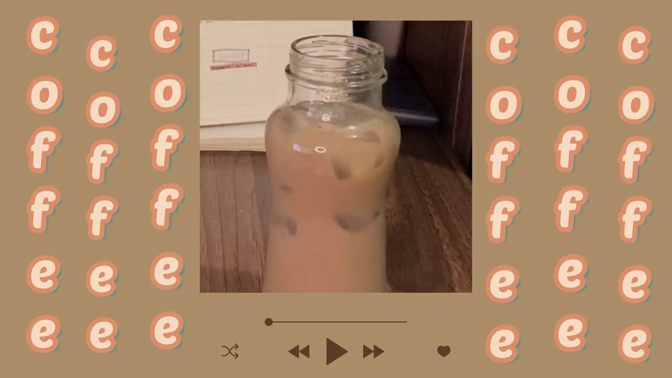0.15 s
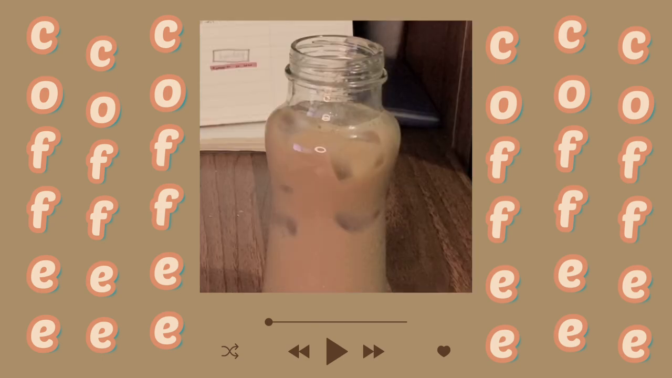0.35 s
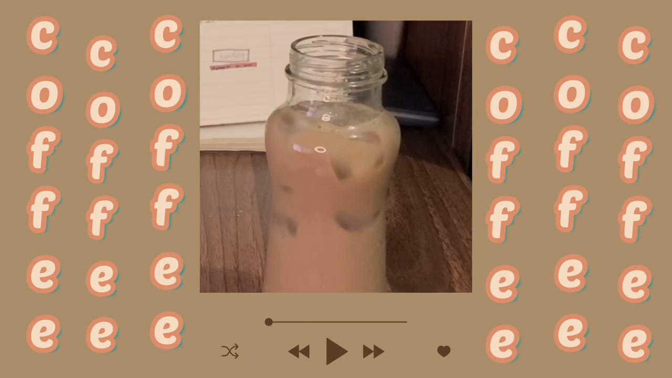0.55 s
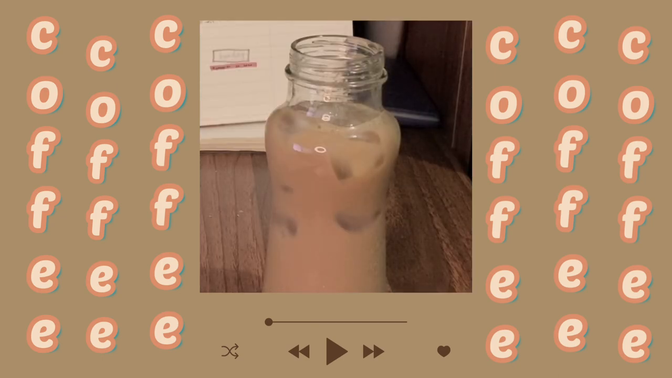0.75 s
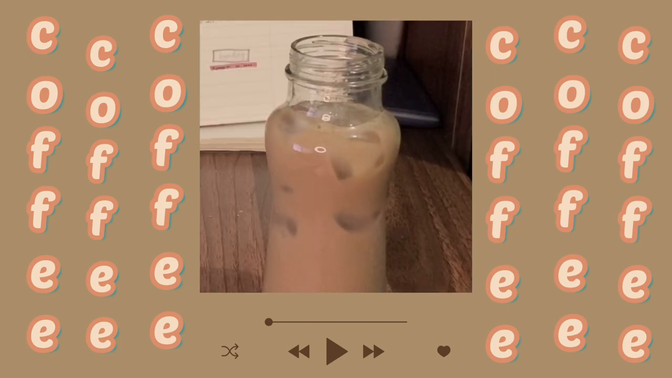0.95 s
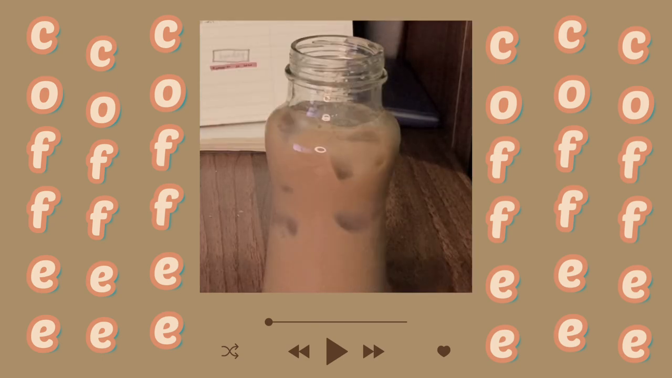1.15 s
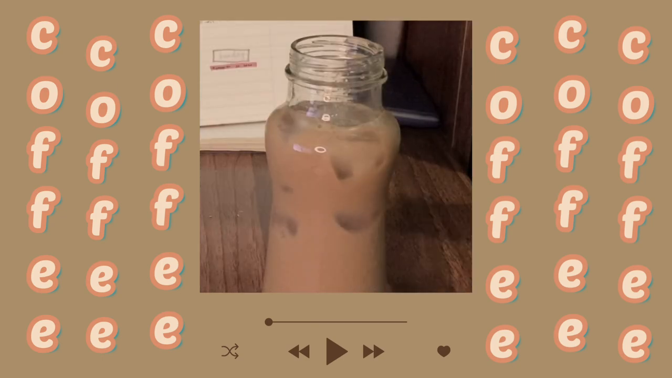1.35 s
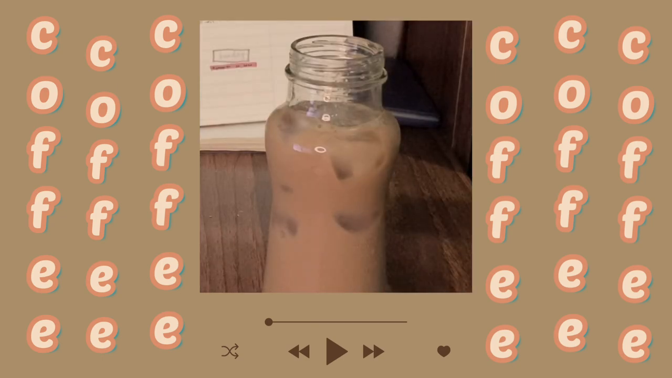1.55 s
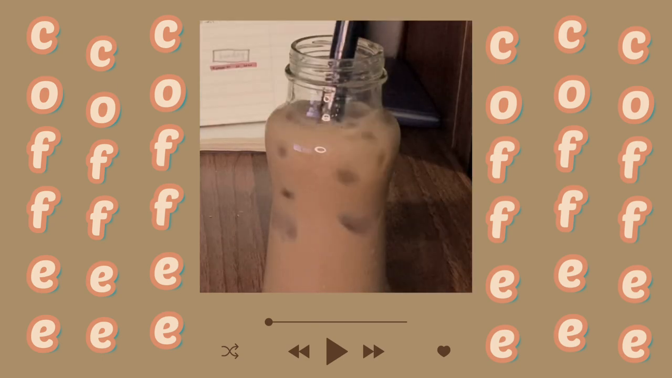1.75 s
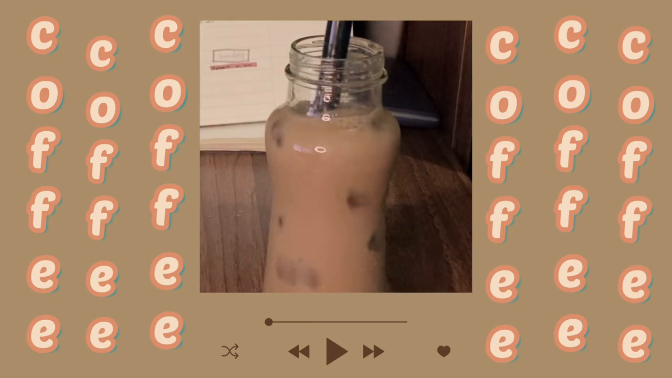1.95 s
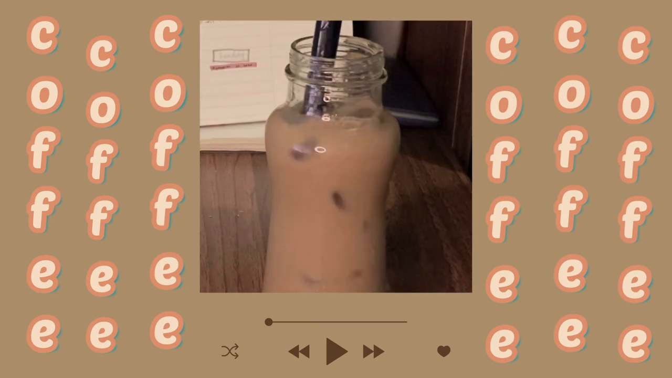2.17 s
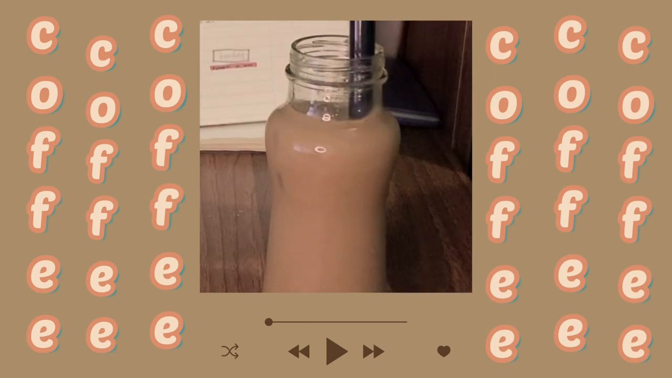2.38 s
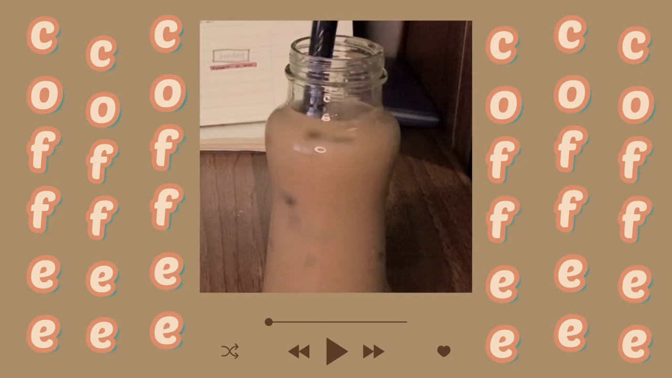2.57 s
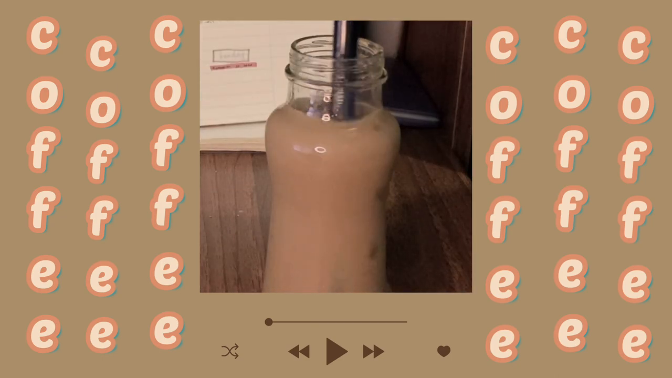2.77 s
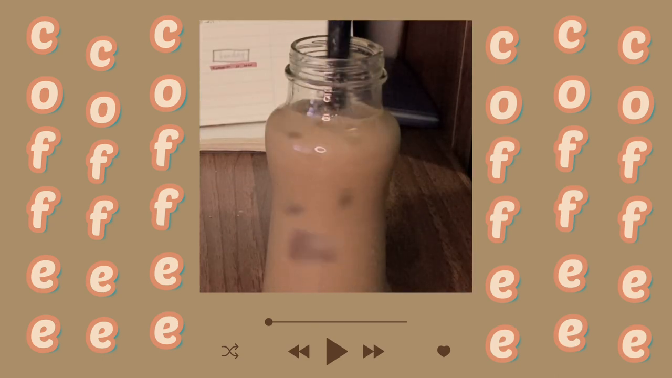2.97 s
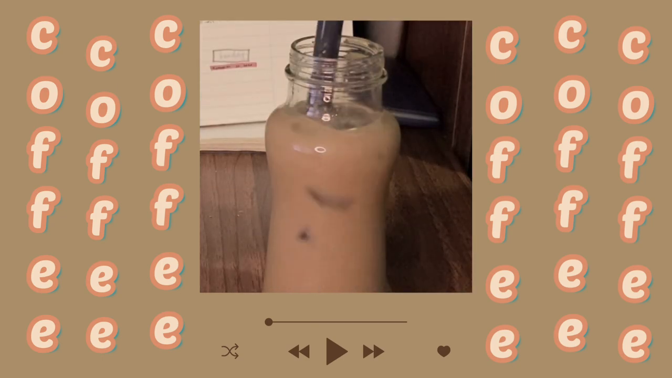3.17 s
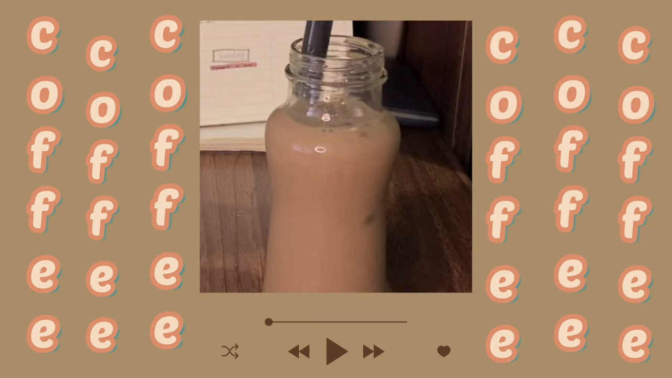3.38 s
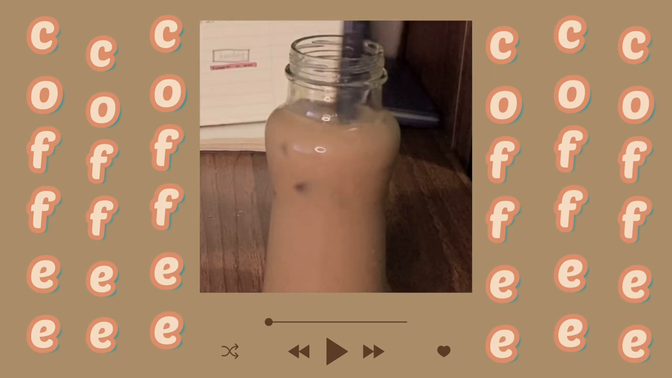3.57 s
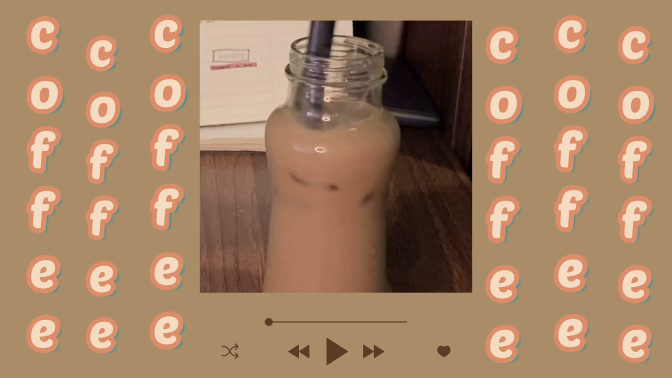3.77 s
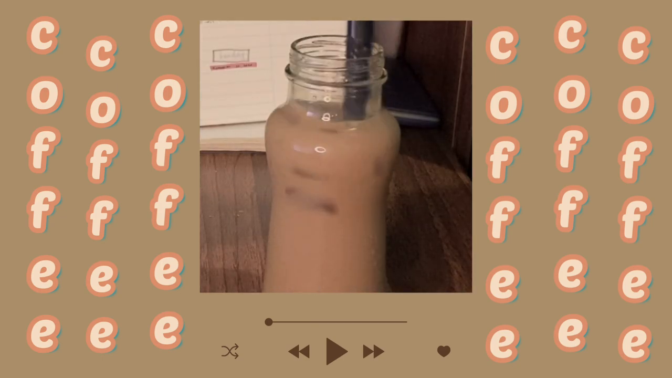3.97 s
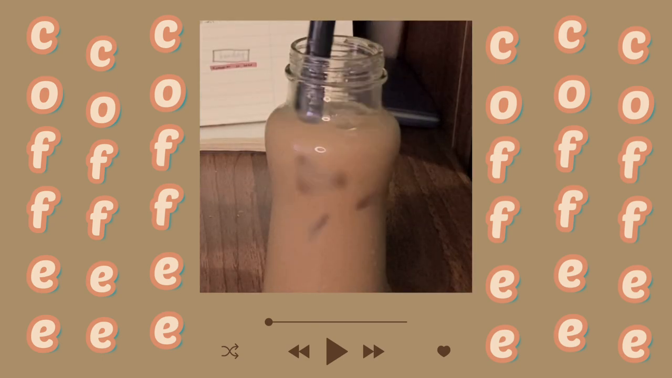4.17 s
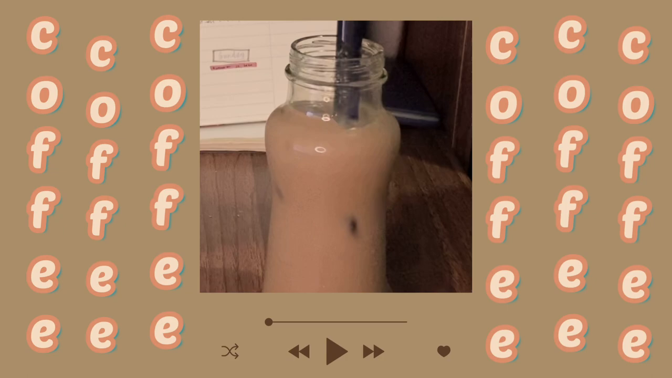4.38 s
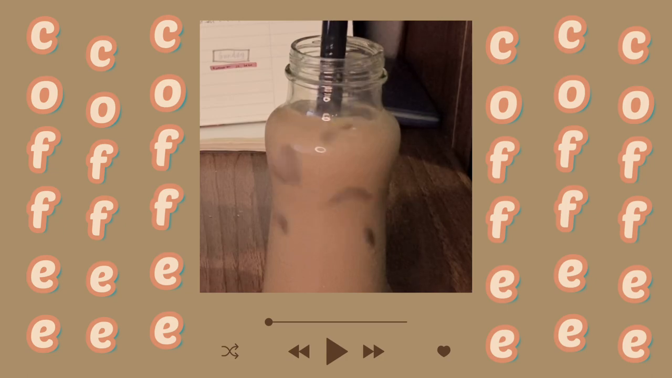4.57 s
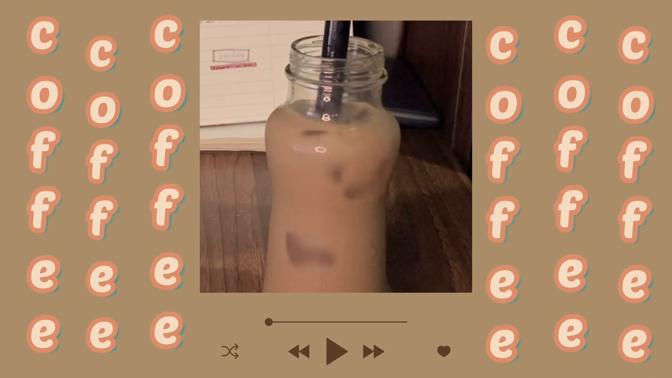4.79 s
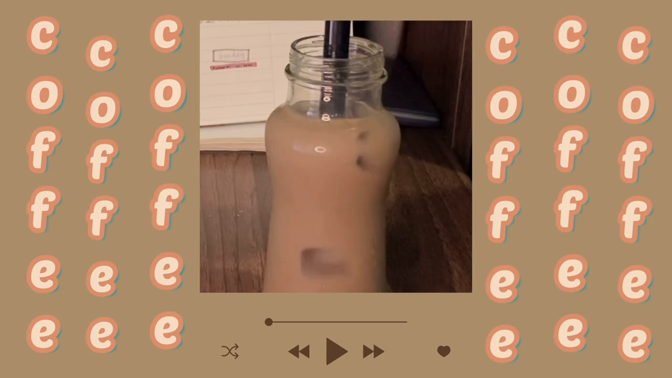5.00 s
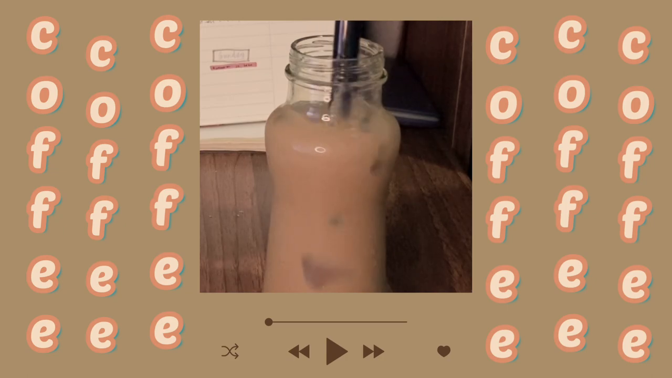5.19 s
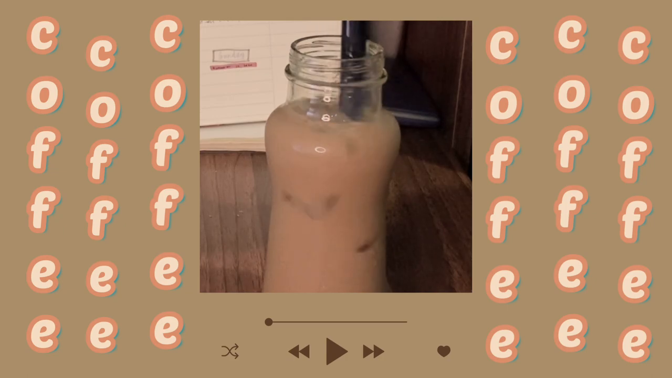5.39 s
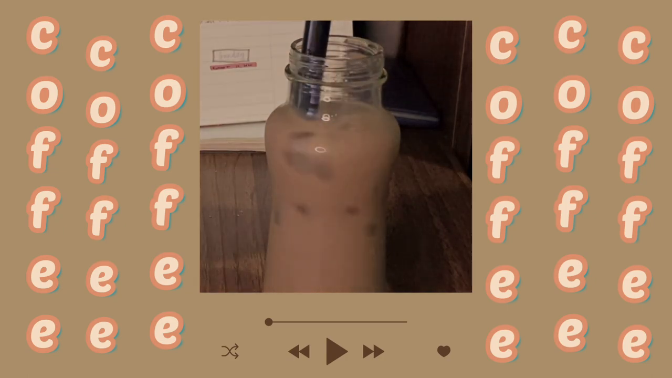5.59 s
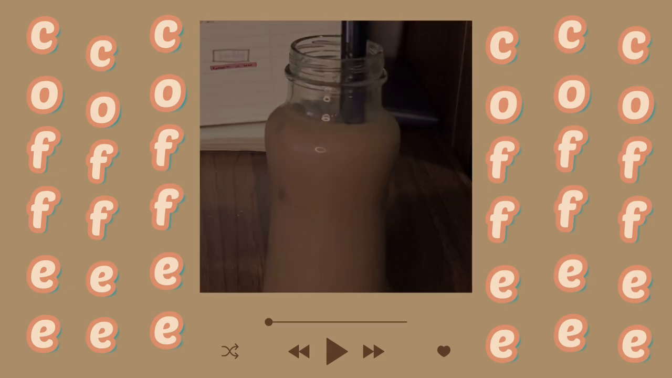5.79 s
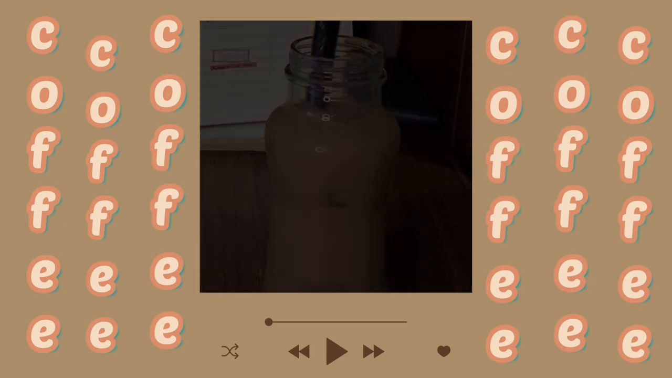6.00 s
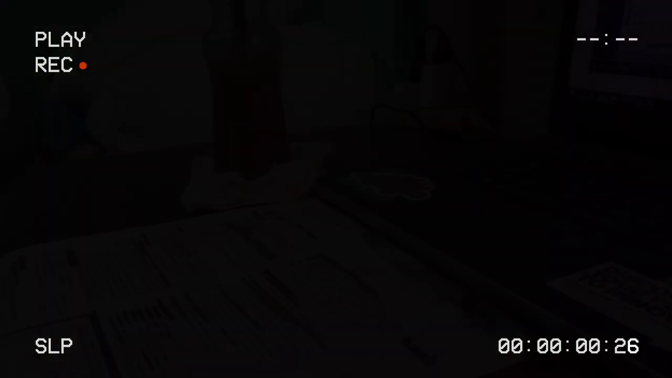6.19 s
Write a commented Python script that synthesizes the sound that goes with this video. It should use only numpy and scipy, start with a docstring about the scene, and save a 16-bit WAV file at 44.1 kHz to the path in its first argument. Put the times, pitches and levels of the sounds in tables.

```python
"""Iced coffee stirred in a glass bottle

A straw stirs ice cubes in a glass bottle on a wooden desk, close to a phone in a small quiet room.
Cubes strike and graze the glass: sums of decaying modes, short because the drink damps the wall, with noise for ice.
Harder pushes excite modes of the desk; low handling thuds come first, as decaying sines.
Noise-built echoes give the room and its shelves; wavering sines and coloured noise give an appliance hum and air."""
import sys
import numpy as np
from scipy import signal
from scipy.fft import rfft, irfft
from scipy.io import wavfile
from scipy.ndimage import uniform_filter1d

SR = 44100
rng = np.random.default_rng(int(sys.argv[2]) if len(sys.argv) > 2 else 0)


def unload_wav(signal):
    """Save mono or channel-first audio to the path in sys.argv[1] as 16-bit WAV at rate SR, clipped to [-1, 1]."""
    wavfile.write(
        sys.argv[1],
        SR,
        np.round(np.clip(np.atleast_2d(signal).T, -1, 1) * 32767).astype(np.int16),
    )


N = 275492
T = np.arange(N) / SR  # time/s
AGE = np.arange(4096) / SR  # time since a contact/s
END_S, TOP_HZ = 6.2, 16000  # where the sound stops/s, upper band limit/Hz

# Appliance hum, before wavering: f/Hz, rms level/dB
HUM_TONES = [(57.8, -58), (76.0, -53.5), (152.0, -64), (227.0, -62.5), (302.0, -75), (699.0, -75)]
# Spectral density of room air and microphone hiss: f/Hz, relative level/dB per Hz
AIR_SPECTRUM = [(20, -40), (48, -2.5), (90, -1), (140, -2.5), (200, -8), (310, -7), (520, -14), (800, -12),
                (1400, -17.5), (3000, -23), (4300, -20.5), (5300, -36.5), (11000, -44), (13000, -48),
                (16000, -62.5)]
AIR_DB = -50.5  # rms level/dB
# Soft handling bumps on the phone: t/s, f/Hz, relative level/dB
HANDLING_BUMPS = [(0.0, 68, -28), (0.046, 103, -28.5), (0.108, 100, -34), (0.137, 87.6, -30.5),
                  (0.164, 63, -27)]
# Cubes that hit the glass squarely: t/s, then relative wall ring level/dB, crack level/dB, tick level/dB
SQUARE_HITS = [(1.71, -21, -43, -29.5), (1.7245, -22, -41, -48), (1.7331, -19, -32.5, -30),
               (1.7448, -26, -37, -27), (1.7627, -20.5, -34, -51), (1.803, -18.5, -31, -48),
               (1.8674, -21, -42, -65), (2.0402, -25, -25.5, -25.5), (2.0977, -46, -36, -46),
               (2.138, -28, -31.5, -40), (2.153, -20, -49, -60), (2.165, -28, -25, -29.5),
               (2.178, -38, -36, -58), (2.2305, -20.5, -27, -29), (2.267, -25.5, -28, -30),
               (2.2919, -26.5, -42, -40), (2.307, -27, -32.5, -42), (2.3596, -31.5, -41.5, -42),
               (2.3722, -24, -34.5, -34), (2.3797, -26, -33.5, -50), (2.5104, -23.5, -35.5, -54),
               (2.5738, -24.5, -33.5, -31), (2.7268, -33.5, -35, -42.5), (2.9551, -51, -38, -65),
               (3.094, -33.5, -41, -47.5), (3.2264, -43, -28.5, -26), (3.3775, -60, -59, -38.5),
               (3.4175, -23.5, -37, -34.5), (3.462, -25.5, -45, -33.5), (3.492, -29, -44, -46),
               (3.5504, -39, -37, -43), (3.5751, -22, -33, -34), (3.598, -27, -34, -34),
               (3.6382, -31.5, -44.5, -47), (3.7678, -27, -32, -59), (3.82, -25, -30, -33.5),
               (3.9086, -30.5, -42.5, -45), (4.0177, -24, -30, -60), (4.0397, -22, -20, -17),
               (4.05, -22, -25, -28), (4.0651, -22, -40, -33), (4.0728, -24, -34, -29),
               (4.096, -40, -30, -33.5), (4.1054, -21, -36, -48), (4.145, -30.5, -50, -64),
               (4.221, -31, -38, -44), (4.328, -29, -33, -33), (4.3752, -32, -56, -49),
               (4.4012, -27, -29, -36), (4.4227, -26.5, -30.5, -30.5), (4.4465, -27, -41, -59),
               (4.4673, -40, -35, -34), (4.4779, -36, -40, -40), (4.6104, -27.5, -42.5, -63),
               (5.0263, -30, -35.5, -49), (5.0852, -19.5, -29, -21.5), (5.1148, -47, -35.5, -29.5),
               (5.1492, -22.5, -21, -30), (5.1669, -21, -29, -42), (5.1881, -26, -38, -58),
               (5.2939, -31.5, -46, -66), (5.341, -23, -35, -55), (5.375, -28, -35, -37),
               (5.391, -22, -45, -57), (5.4435, -24, -29.5, -23), (5.4524, -30, -30, -52),
               (5.5987, -37, -42.5, -43.5), (5.7267, -32, -50, -74), (5.765, -29.5, -43, -57),
               (5.8393, -24, -32, -41), (5.8569, -32, -34, -46), (5.8816, -30.5, -36.5, -59),
               (5.976, -26, -30, -19.5), (6.017, -44, -45, -34.5), (6.133, -37, -38, -55),
               (6.162, -37, -28.5, -29.5)]
# Pitch of the bottle wall as the drink swirls: t/s, f/Hz
WALL_PITCH_CURVE = [(1.7, 1834), (2.25, 1943), (2.9, 1837), (3.45, 1707), (3.85, 1826), (4.06, 1744),
                    (4.45, 1798), (5.09, 1920), (5.2, 1792), (5.85, 1862), (6.2, 1836)]
# Lowest wall modes of the filled bottle: multiple of the wall pitch, t60/s, relative level/dB
WALL_MODES = [(.89, 0.0047, -29), (1.0, .017, 24), (1.13, .013, -4)]
# Upper modes of the glass: f/Hz, t60/s, relative level/dB
GLASS_MODES = [(2556, 0.021, -0.5), (3237, 0.023, -10), (3740, 0.026, -5.5), (4330, 0.012, 1),
               (4640, 0.045, -5.5), (4920, 0.023, -3.5), (5440, 0.0082, -19), (6476, 0.014, -2.5),
               (7070, 0.011, -8), (7420, 0.0092, -9), (9920, 0.016, 4.5), (10600, 0.008, -8.5),
               (11600, 0.027, -2.5), (13000, 0.007, 3.5), (15100, 0.017, -7)]
# Spectrum of the brittle snap of ice: f/Hz, relative level/dB
SNAP_SPECTRUM = [(300, 1.5), (1000, -2), (2500, 2), (4500, 7), (7000, 1), (11000, 7.5), (13000, -22),
                 (16000, 0)]
# Corners that catch one mode of the glass and make it sing: t/s, f/Hz, level/dB
SINGING_PINGS = [(2.2301, 4760, -20), (2.3801, 4770, -36), (2.5735, 2470, -33), (4.055, 2620, -32),
                 (4.0725, 4040, -30), (4.4225, 4720, -30.5), (4.4663, 4730, -25.5), (4.767, 4800, -38.5),
                 (5.0848, 3180, -27), (5.1507, 4380, -23), (5.3527, 4770, -31.5), (5.9754, 3398, -28),
                 (6.018, 3300, -39.5), (6.1328, 3360, -38)]
# Pushes that knock the bottle on the desk: t/s, level/dB, brightness/dB per octave
DESK_PUSHES = [(1.71, -23.5, 3), (1.75, -33, -3), (1.846, -33, 1.5), (1.877, -32.5, 3.5), (2.381, -35, 2),
               (3.226, -40.5, -0.5), (3.418, -31, 1), (3.462, -34, 2.5), (3.574, -34.5, 3.5),
               (4.042, -29.5, -5), (4.105, -36, 0), (4.475, -34.5, 1.5), (5.086, -26, 0), (5.122, -35, -4),
               (5.39, -34, 0.5), (5.441, -31, -1.5), (5.977, -35, -2)]
# Modes of the desk under the bottle: f/Hz, t60/s, relative level/dB
DESK_MODES = [(107.8, 0.063, -0.5), (149.4, 0.093, -3.5), (245, 0.032, -10), (271.7, 0.061, 0),
              (341, 0.017, -0.5), (425, 0.056, -12.5), (661, 0.028, -9.5), (895, 0.026, -15)]
# What the room gives back: f/Hz, level/dB
ROOM_RESPONSE = [(100, 2), (300, 9), (1000, 7), (1900, 4), (4500, -3), (8000, -5), (16000, -13.5)]
# Cubes and straw dragging along the glass: t/s, length/s, relative level/dB, centre of the rasp f/Hz
DRAGS = [(1.724, 0.047, -36.5, 1980), (1.846, 0.034, -44.5, 2210), (2.09, 0.13, -40.5, 1290),
         (2.14, 0.23, -48, 2620), (2.63, .15, -49, 2340), (2.85, .11, -51, 2500),
         (3.578, .038, -46.5, 1910), (4.02, 0.085, -35.5, 1950), (4.43, .06, -49, 1860),
         (5.152, 0.044, -41, 1960), (5.345, 0.043, -42.5, 1870), (5.835, 0.03, -46, 1850)]
RASP_T60_S = 0.008
# Straw strokes that set the cubes jostling: t/s, length/s, relative wall level/dB, relative tick level/dB
STRAW_STROKES = [(1.729, 0.17, -35, -63.5), (2.077, .26, -38.5, -57), (2.512, 0.26, -41, -62),
                 (2.894, 0.031, -41.5, -54.5), (3.24, 0.03, -42.5, -52), (3.457, .16, -41, -48),
                 (3.752, 0.1, -40, -56), (4.002, .1, -35, -55), (4.319, .17, -34.5, -47),
                 (5.063, 0.093, -37.5, -56), (5.343, 0.17, -39, -58), (5.802, 0.062, -40.5, -54),
                 (5.971, 0.043, -35, -50), (6.167, .03, -39, -44)]
PICK_UP_DB_PER_S, SETTLE_DB_PER_S = 602, 188  # how fast the jostling rises and dies down
DRIFT_WALL_DB, DRIFT_TICK_DB = -48.5, -67  # floors: cubes drifting between strokes, relative levels/dB
# Blows that reach the dry neck: t/s, level/dB
HARD_BLOWS = [(2.573, -48), (3.228, -38), (3.4175, -49), (3.5756, -33), (4.041, -18), (5.0856, -50)]
# Modes of the neck, which no liquid damps: f/Hz, t60/s, relative level/dB
NECK_MODES = [(9585, 0.087, 5), (13500, .035, -6), (15100, 0.092, -5)]
# A spell of wet little clicks among the cubes at the surface
PLIPS_START_S, PLIPS_LENGTH_S, PLIPS_HZ, PLIPS_DB = 2.635, 0.15, 2210, -40  # dB: before scatter and fade
# Phase by which the left port leads: f/Hz, phase/rad
PORT_PHASE = [(100, -0.5), (1700, 0.82), (2000, .5), (6600, 1.35), (9400, -3), (10500, -1), (16000, -2)]
# Left minus right: f/Hz, level/dB
PORT_BALANCE = [(100, 4), (400, 3.5), (1300, 1), (2400, 2.5), (4700, 4), (6500, 1.5), (9000, 0.5),
                (15000, -0.5)]
# Microphone response with a narrow treble dip; the end values hold beyond: f/Hz, level/dB
MIC_RESPONSE = [(7700, 1), (8500, -7.5), (9050, -15.5), (9500, -3.5)]


def undb(db):
    """Definition of level: amplitude ratio from decibels."""
    return 10 ** (np.asarray(db) / 20)


def along(points, n):
    """Logarithmic frequency scale: (f/Hz, value) points interpolated on the bins of n samples."""
    hz, value = np.transpose(points)
    bins_hz = np.arange(n // 2 + 1) * SR / n
    return np.interp(np.log(bins_hz + 1), np.log(hz), value)  # + 1 keeps the zero bin finite


def colour(x, points):
    """Linear filtering: multiply the spectrum by a gain curve of (f/Hz, level/dB) points."""
    n = x.shape[-1]
    return irfft(rfft(x) * undb(along(points, n)), n)


def unit(x):
    """Normalisation of power: scale to rms 1."""
    return x / np.sqrt(np.mean(x ** 2))


def crest(x, db):
    """Short-time power: scale each row so that sqrt(2) times its largest 64-sample rms reaches db."""
    power = 2 * uniform_filter1d(x ** 2, size=64, axis=-1).max(axis=-1, keepdims=True)
    return x * undb(db)[..., None] / np.sqrt(power)


def ring(hz, t60, rise_s):
    """Damped oscillation: a struck mode swells over rise_s and decays exponentially; one row per pitch."""
    envelope = np.exp(-np.log(1000) * AGE / t60) * (1 - np.exp(-AGE / rise_s))
    return np.sin(2 * np.pi * np.asarray(hz)[..., None] * AGE, dtype=np.float32) * envelope


def place(times, sounds):
    """Superposition: add each sound to the time line at its onset."""
    out = np.zeros(N + len(AGE))
    for s, sound in zip(times, sounds):
        i = int(max(s, 0) * SR)
        out[i:i + len(sound)] += sound
    return out[:N]


def background(waver=0.33, alike_hz=330):
    """Tones in diffuse noise: a wavering hum over steady air noise, whose bass is alike at both ports."""
    knots = np.linspace(0, T[-1], num=24)
    hum = 0
    for hz, db in HUM_TONES:
        wavering = 1 + waver * np.interp(T, knots, rng.standard_normal(len(knots)))
        tone = np.sin(2 * np.pi * (hz * T + rng.random()))
        hum = hum + np.sqrt(2) * undb(db) * wavering * tone
    mid, side = rng.standard_normal((2, N))
    side = signal.sosfilt(signal.butter(2, alike_hz, "high", fs=SR, output="sos"), side)
    air = colour(np.array([mid + side, mid - side]), AIR_SPECTRUM)
    return hum + undb(AIR_DB) * unit(air)


def bumps(t60=0.066, rise_s=0.0091, overtone=2.24, overtone_db=-9, overtone_t60=0.031,
          tick_s=0.188, tick_hz=10500, tick_t60=0.006, tick_db=-47):
    """Damped low modes: each handling thud has a tone and an overtone; separately, a faint high tick sounds at
    0.19 s."""
    s, hz, db = np.transpose(HANDLING_BUMPS)
    fundamental = crest(ring(hz, t60, rise_s), db + 1.5)
    upper = crest(ring(hz * overtone, overtone_t60, rise_s), db + overtone_db)
    tick = crest(ring(tick_hz, tick_t60, tick_t60 / 2), tick_db)
    return place(s, fundamental + upper) + place([tick_s], [tick])


def wall_pitch(s, detune=0.019):
    """Liquid loading: wall pitch drifts as the drink swirls and differs a little from spot to spot."""
    return np.interp(s, *np.transpose(WALL_PITCH_CURVE)) * (1 + detune * rng.standard_normal(len(s)))


def wall(hz, detune=0.019, scatter_db=3, rise_s=0.00094):
    """Damped modes under liquid loading: the bottle wall rings only briefly."""
    chance = rng.standard_normal((len(hz), len(WALL_MODES), 2))
    total = 0
    for k, (ratio, t60, db) in enumerate(WALL_MODES):
        gain = undb(db + scatter_db * chance[:, k, :1])
        total = total + gain * ring(hz * ratio * (1 + detune * chance[:, k, 1]), t60, rise_s)
    return total


def glass(count, scatter_db=6, detune_hz=110, rise_s=0.00044,
          snap_db=8, snap_s=0.0021, crumble_db=-16, crumble_s=0.013):
    """Modal excitation by position: each spot rings its own mix of modes, under a noise snap of crushed ice."""
    chance = rng.standard_normal((count, len(GLASS_MODES), 2))
    modes = 0
    for k, (hz, t60, db) in enumerate(GLASS_MODES):
        gain = np.sign(chance[:, k, :1]) * undb(db + scatter_db * chance[:, k, 1:])
        modes = modes + gain * ring(hz + detune_hz * chance[:, k, 0], t60, rise_s)
    crush = colour(rng.standard_normal((count, len(AGE))), SNAP_SPECTRUM)
    decay = np.exp(-AGE / snap_s) + undb(crumble_db) * np.exp(-AGE / crumble_s)
    return modes + undb(snap_db) * crush * decay * (1 - np.exp(-AGE / rise_s))


def strikes(hz, wall_db, crack_db, tick_db, split_hz=6100):
    """Contact hardness: blunt, wet contacts mostly ring the wall; hard corners add a crack and a bright tick."""
    bright = glass(len(hz))
    crack = signal.sosfilt(signal.butter(4, split_hz, "low", fs=SR, output="sos"), bright)
    tick = signal.sosfilt(signal.butter(4, split_hz, "high", fs=SR, output="sos"), bright)
    return crest(wall(hz), wall_db) + crest(crack, crack_db) + crest(tick, tick_db)


def clinks(wall_db=-2.0, crack_db=-2.0, tick_db=-1, touch_db=-12, touch_s=0.0035,
           bounce_db=-17, bounce_s=0.013, bounce_spread=0.25):
    """Repeated impact: a tumbling cube touches with one corner, lands on its face, then bounces once."""
    s, low, middle, high = np.transpose(SQUARE_HITS)
    hz = wall_pitch(s)
    face = strikes(hz, low + wall_db, middle + crack_db, high + tick_db)
    corner = strikes(hz, low + wall_db, middle + crack_db, high + tick_db)
    touch = s - touch_s * rng.random(len(s))
    bounce = s + bounce_s * np.exp(bounce_spread * rng.standard_normal(len(s)))
    return undb(touch_db) * place(touch, corner) + place(s, face) + undb(bounce_db) * place(bounce, corner)


def pings(t60=0.013, rise_s=0.0047, usual_hz=4700, spread=0.048, usual_db=-10):
    """Selective modal excitation: each clink pings faintly near usual_hz, and some corners make a mode sing."""
    s, _, crack, _ = np.transpose(SQUARE_HITS)
    usual = usual_hz * (1 + spread * rng.standard_normal(len(s)))
    faint = crest(ring(usual, t60, rise_s), crack + usual_db)
    when, hz, db = np.transpose(SINGING_PINGS)
    return place(s, faint) + place(when, crest(ring(hz, t60, rise_s), db))


def desk(s, db, tilt_db, scatter_db=1.0, detune=0.046, rise_cycles=0.89, pivot_hz=280):
    """Structure-borne sound: a push excites the desk's modes, the lowest of which swell most slowly."""
    chance = rng.standard_normal((len(s), len(DESK_MODES), 2))
    wood = 0
    for k, (hz, t60, mode_db) in enumerate(DESK_MODES):
        tilt = tilt_db[:, None] * np.log2(hz / pivot_hz)
        gain = (-1) ** k * undb(mode_db + tilt + scatter_db * chance[:, k, :1])
        wood = wood + gain * ring(hz * (1 + detune * chance[:, k, 1]), t60, rise_cycles / hz)
    return place(s, crest(wood, db))


def knocks(rock_s=0.026, rock_db=-11, rock_tilt_db=-2, rock_spread=0.195):
    """Rocking impact: a push tips the bottle against the desk, and it rocks back more softly and dully."""
    s, db, tilt_db = np.transpose(DESK_PUSHES)
    back = s + rock_s * np.exp(rock_spread * rng.standard_normal(len(s)))
    return desk(s, db, tilt_db) + desk(back, db + rock_db, tilt_db + rock_tilt_db)


def room(x, early_db=-10, early_s=0.0066, late_db=-12, t60=0.3, gap_s=0.0028):
    """Reverberation: sparse echoes off desk and shelves, then a short diffuse tail, different at each port."""
    t = T[:SR // 2]
    arrived = np.clip(t / gap_s - 1, 0, 1)
    early = rng.laplace(size=(2, len(t))) * np.exp(-t / early_s) * arrived  # spiky noise
    late = rng.standard_normal((2, len(t))) * np.exp(-np.log(1000) * t / t60) * arrived
    echo = undb(early_db) * early / np.linalg.norm(early, axis=1, keepdims=True)
    echo += undb(late_db) * late / np.linalg.norm(late, axis=1, keepdims=True)
    return colour(signal.fftconvolve(x[None], echo, axes=1)[:, :N], ROOM_RESPONSE)


def scrapes(count=12, scatter_db=1.5, wall_db=-5, crack_db=-4, tick_db=-11, spread=0.12):
    """Stick-slip friction: a drag is a quick, uneven run of tiny contacts, each with a short, dull rasp."""
    start, length, db, hz = np.repeat(DRAGS, count, axis=0).T
    step = np.arange(len(start)) % count
    s = start + length * (step + rng.random(len(start))) / count
    size, pitch = rng.standard_normal((len(s), 2)).T
    db = db + scatter_db * size
    rasp = crest(ring(hz * np.exp(spread * pitch), RASP_T60_S, RASP_T60_S / 10), db)
    return place(s, rasp + strikes(wall_pitch(s), db + wall_db, db + crack_db, db + tick_db))


def jostle(s):
    """Build-up and decay: wall and tick levels at s, as strokes pick the cubes up and let them settle."""
    start, length, low, high = np.transpose(STRAW_STROKES)
    age = s[:, None] - start
    pick_up_db = PICK_UP_DB_PER_S * np.maximum(-age, 0)  # the rise leads up to the stroke
    settle_db = SETTLE_DB_PER_S * np.maximum(age - length, 0)
    fade_db = pick_up_db + settle_db
    wall_level = np.maximum((low - fade_db).max(axis=1), DRIFT_WALL_DB)
    tick_level = np.maximum((high - fade_db).max(axis=1), DRIFT_TICK_DB)
    return wall_level, tick_level


def grazes(count=280, scatter_db=3.0, hardness_db=3.0, crack_db=-1.0, tick_db=-3):
    """Random contacts: one light touch per equal interval, of varying size and hardness, as the ice circles."""
    first = STRAW_STROKES[0][0]
    s = first + (np.arange(count) + rng.random(count)) / count * (END_S - first)
    size, hardness = rng.standard_normal((count, 2)).T
    low, high = jostle(s)
    low = low + scatter_db * size
    high = high + scatter_db * size + hardness_db * hardness
    return place(s, strikes(wall_pitch(s, detune=0.04), low, (low + high) / 2 + crack_db, high + tick_db))


def neck(rise_s=0.0012):
    """Undamped modes: hard blows also ring the dry neck with a few thin, high notes."""
    s, db = np.transpose(HARD_BLOWS)
    notes = sum(undb(mode_db) * ring(hz, t60, rise_s) for hz, t60, mode_db in NECK_MODES)
    return place(s, crest(notes, db))


def plips(count=9, t60=0.019, rise_s=0.00032, spread=0.042, scatter_db=1.0, fade_db_per_s=25):
    """Brief resonance: short, wet notes with no crack, growing softer as the surface calms."""
    age = PLIPS_LENGTH_S * (np.arange(count) + rng.random(count)) / count
    size, pitch = rng.standard_normal((count, 2)).T
    notes = ring(PLIPS_HZ * np.exp(spread * pitch), t60, rise_s)
    return place(PLIPS_START_S + age, crest(notes, PLIPS_DB + scatter_db * size - fade_db_per_s * age))


def scene():
    """Interaural-style differences: the two ports hear the bottle out of phase, and all sound unequally loud."""
    bottle = clinks() + pings() + knocks() + scrapes() + grazes() + neck() + plips()
    right = irfft(rfft(bottle) * np.exp(-1j * along(PORT_PHASE, N)), N)
    both = np.array([bottle, right]) + room(bottle) + background() + bumps()
    half_balance_db = np.array([[0.5], [-0.5]]) * along(PORT_BALANCE, N)
    return irfft(rfft(both) * undb(half_balance_db), N)


def record(dry):
    """Band limitation: the phone colours the treble and cuts the top; the sound stops just before the end."""
    stop = np.clip((END_S - T) * 200 + 1, 0, 1)  # 5 ms fade
    heard = colour(dry, MIC_RESPONSE) * stop
    return signal.sosfilt(signal.ellip(8, 0.2, 70, TOP_HZ, fs=SR, output="sos"), heard)


dry = scene()
out = record(dry)
unload_wav(out)
```